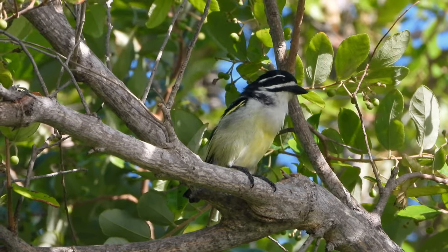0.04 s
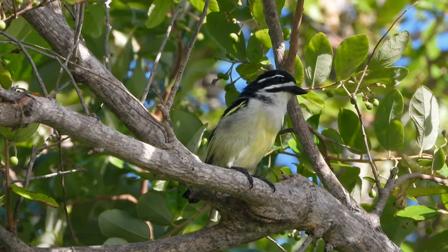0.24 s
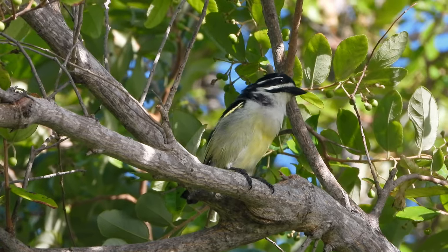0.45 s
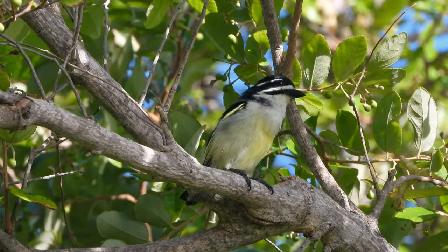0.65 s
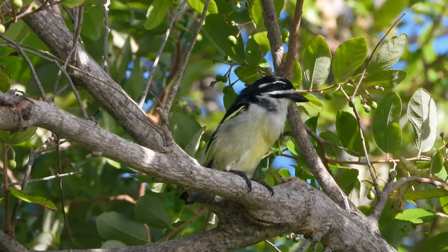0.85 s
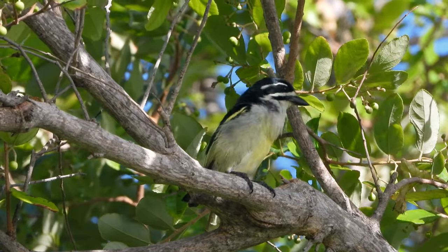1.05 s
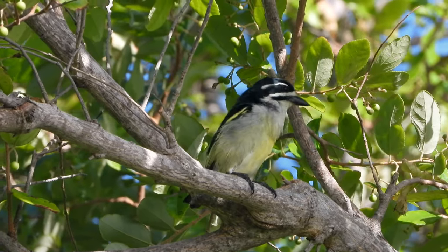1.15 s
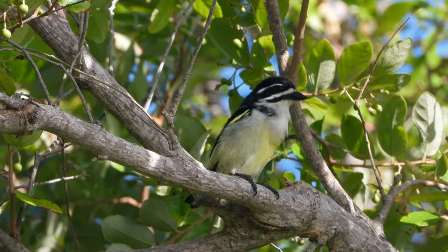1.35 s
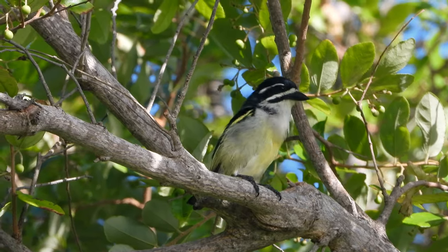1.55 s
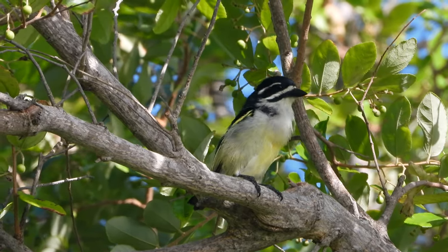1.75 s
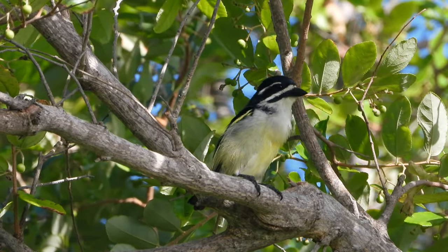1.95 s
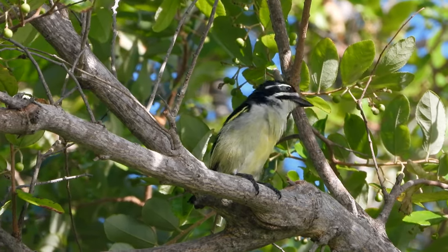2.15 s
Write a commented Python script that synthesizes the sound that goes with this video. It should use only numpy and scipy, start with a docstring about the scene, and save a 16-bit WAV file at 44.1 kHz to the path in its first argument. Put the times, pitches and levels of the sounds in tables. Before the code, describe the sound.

A small bird hoots five times in steady rhythm, with thin chirps from another bird.

```python
"""In a wood, leaves and distant air make a soft hiss, and faint whistles come from far off.
A tinkerbird on a branch gives five short, nearly pure hoots in a steady rhythm; reflection from the
trees sends each one back. Another small bird adds thin, high chirps, and near the end a few ticks
ring the damped modes of wood. All this is in the right channel; the left carries only its own hiss."""
import sys
import numpy as np
from scipy import signal
from scipy.fft import rfft, irfft
from scipy.io import wavfile

SR = 44100
rng = np.random.default_rng(int(sys.argv[2]) if len(sys.argv) > 2 else 0)


def unload_audio(sound):
    """Save the sound as a 16-bit wav file, at the path given as the first command line argument."""
    columns = np.transpose(np.atleast_2d(sound))
    # keep every value between -1 and 1, then stretch to whole-number steps
    steps = np.round(np.clip(columns, -1, 1) * 32767)
    wavfile.write(sys.argv[1], SR, steps.astype(np.int16))


N = 97020
TIME = np.arange(N) / SR
FREQS = np.maximum(np.arange(N // 2 + 1) * SR / N, 1)


def from_db(db):
    """Logarithmic level: 20 dB is a factor of ten in amplitude."""
    return 10 ** (np.asarray(db) / 20)


def noise(gains):
    """Spectral shaping: white noise weighted by a gain at each frequency, scaled to rms 1."""
    x = irfft(rfft(rng.standard_normal(N)) * gains, N)
    return x / np.std(x)


def colour(points):
    """Spectral envelope: gains interpolated between (frequency [Hz], level [dB]) points."""
    hz, db = np.transpose(points)
    return from_db(np.interp(np.log(FREQS), np.log(hz), db))


def drift(rate_hz):
    """Random modulation: low-passed noise of rms 1."""
    return noise(1 / (1 + (FREQS / rate_hz) ** 2))


def band_noise(edges_hz, order=3):
    """Band-pass filtering: noise of rms 1 between two frequencies."""
    band = signal.butter(order, edges_hz, "band", fs=SR, output="sos")
    x = signal.sosfilt(band, rng.standard_normal(N))
    return x / np.std(x)


def swell(middle, length):
    """Gaussian envelope: 1 at the middle, 1/e half a length to either side."""
    return np.exp(-(2 * (TIME - middle) / length) ** 2)


def among_trees(direct, echoes, scatter_db, t60_s):
    """Reflection and scattering: trees add distinct echoes, leaves an exponentially dying tail."""
    age = TIME[:SR // 2]
    build_up = np.minimum(age / .015, 1)
    tail = rng.standard_normal(len(age)) * from_db(-60 * age / t60_s) * build_up
    scattered = from_db(scatter_db) * signal.fftconvolve(direct, tail / np.linalg.norm(tail))[:N]
    reflected = sum(from_db(db) * np.interp(TIME - delay, TIME, direct, left=0) for delay, db in echoes)
    return direct + scattered + reflected


# Spectrum of the left channel's hiss: (frequency [Hz], relative density [dB])
HISS_SPECTRUM = [(30, -31), (60, -16), (110, -19), (200, -4.5), (400, -3), (1200, -1), (4000, -1),
                 (7000, -3), (11000, -6), (15500, -10.5)]

def hiss(level_db=-51.5, waver_db=0.33):
    """Noise floor: a broadband hiss whose level wavers slightly."""
    return from_db(level_db + waver_db * drift(6.7)) * noise(colour(HISS_SPECTRUM))


# Spectrum of leaves and distant air: (frequency [Hz], relative density [dB])
AIR_SPECTRUM = [(30, -43), (60, -34), (110, -10), (200, -2), (320, 1), (550, 1), (900, 2), (1600, -2.5),
                (3200, -4.5), (7000, -7), (11000, -11), (15500, -16)]
# The background hiss rises and falls, notably around the first two hoots: (time [s], level [dB])
BACKGROUND_LEVELS = [(0, -49.5), (.1, -48.5), (.17, -45), (.23, -44.5), (.33, -47), (.43, -46.5),
                     (.52, -44), (.6, -46.5), (.72, -46), (.88, -48), (1.35, -47.5), (1.44, -46.5),
                     (1.7, -49), (1.95, -46), (2.08, -45), (2.2, -42)]

def background(treble_hz=3600, treble_share=0.46):
    """Amplitude modulation: the background hiss rises and falls, less so in the treble."""
    times, db = np.transpose(BACKGROUND_LEVELS)
    level = np.interp(TIME, times, db)
    rise_db = level - level.mean()
    broadband = noise(colour(AIR_SPECTRUM))
    low = irfft(rfft(broadband) / (1 + (FREQS / treble_hz) ** 2), N)
    treble = broadband - low
    return from_db(level.mean()) * (low * from_db(rise_db) + treble * from_db(treble_share * rise_db))


# Swells of mid-pitched hiss: (middle time [s], length [s], level [dB])
HISS_SWELLS = [(0.174, 0.084, -53.5), (0.527, 0.028, -53.5), (0.72, 0.16, -56.5), (2.07, 0.064, -57.5)]

def hiss_swells(flutter_db=5.5):
    """Random amplitude modulation: brief, fluttering swells of mid-pitched hiss."""
    mid_hiss = band_noise(edges_hz=(1400, 2290), order=2)
    envelope = sum(from_db(db) * swell(middle, length) for middle, length, db in HISS_SWELLS)
    return envelope * from_db(flutter_db * drift(80)) * mid_hiss


# Distant calls: (middle time [s], length [s], frequency [Hz], bandwidth [Hz], level [dB])
FAR_WHISTLES = [(0.536, 0.4, 1644, 49.7, -56), (1.27, 0.17, 4270, 420, -55.5)]

def far_whistles():
    """Narrow-band noise has a pitch: faint whistles, blurred by distance into swells."""
    out = 0
    for middle, length, hz, width, db in FAR_WHISTLES:
        peak = 1 / (1 + (2 * (FREQS - hz) / width) ** 2)
        out += from_db(db) * swell(middle, length) * noise(peak)
    return out


# Taps on wood: (time [s], drive level [dB], spectral tilt [dB/octave])
TAPS = [(2.0641, -35, 25), (2.09, -50, -3), (2.1660, -17, 2)]
# Modes of the wood: (frequency [Hz], gain [dB], time to decay by 60 dB [s])
WOOD_MODES = [(2147, 9, 0.011), (2326, -8, 0.038), (3300, 1.5, 0.006), (4480, -4, 0.0072),
              (5600, -6, 0.0065)]
# Reflection of each tap: (delay [s], gain [dB])
TAP_REFLECTIONS = [(0.0114, -11)]

def ticks(contact_s=0.0019, tilt_limit_hz=3220):
    """Modal ringing: each tap excites the same damped modes; a sharper tap favours the upper ones."""
    lowest_hz = WOOD_MODES[0][0]
    out = 0
    for start, db, tilt in TAPS:
        age = np.maximum(TIME - start, 0)
        contact = 1 - np.exp(-(age / contact_s) ** 2)
        for hz, mode_db, t60 in WOOD_MODES:
            lift_db = tilt * np.log2(min(hz, tilt_limit_hz) / lowest_hz)
            decay = from_db(db + mode_db + lift_db - 60 * age / t60)
            out += contact * decay * np.sin(2 * np.pi * hz * age)
    return among_trees(out, TAP_REFLECTIONS, scatter_db=-9, t60_s=0.25)


def note(start, hold, hz, db, attack_s, sag_db_per_s, scoop_hz, scoop_s, fade_s, waver_hz, shimmer_db):
    """Amplitude and frequency modulation: envelope and phase of a note that scoops up, holds, closes."""
    age = np.maximum(TIME - start, 0)
    pitch = hz - scoop_hz * np.exp(-age / scoop_s) + waver_hz * drift(61)
    level = db - sag_db_per_s * np.minimum(age, hold) + shimmer_db * drift(34)
    opening = 1 - np.exp(-(age / attack_s) ** 2)
    closing = np.exp(-(np.maximum(age - hold, 0) / fade_s) ** 2)
    phase = 2 * np.pi * np.cumsum(pitch * (age > 0)) / SR
    return from_db(level) * opening * closing, phase


def blip(end, phase, lag_s, width_s, gain_db, drop_hz, fall_hz_per_s):
    """Linear frequency sweep: a brief tone just after a note, sliding down in pitch."""
    t = TIME - end - lag_s
    phase_lag = 2 * np.pi * t * (drop_hz + fall_hz_per_s * t / 2)
    return from_db(gain_db) * np.exp(-(t / width_s) ** 2) * np.cos(phase - phase_lag)


CHIRP_SHAPE = dict(scoop_hz=40, scoop_s=0.0048, fade_s=0.0049, waver_hz=15, shimmer_db=0.2)
CHIRP_BLIP = dict(lag_s=0.0065, width_s=0.0024, gain_db=0.5, drop_hz=163, fall_hz_per_s=69000)
# The small bird's notes: (time [s], hold [s], frequency [Hz], level [dB], attack [s], sag [dB/s])
CHIRP_NOTES = [(0.471, .018, 6955, -29, 0.0099, 0), (1.125, .027, 6965, -30.5, 0.0046, 40),
               (1.817, 0.0206, 6880, -30.5, 0.0063, 60)]
# Their reflections from the trees: (delay [s], gain [dB])
CHIRP_REFLECTIONS = [(0.0105, -15), (.0290, -17)]

def small_bird():
    """Frequency-modulated pure tones: thin chirps, each ending in a quick downward blip."""
    out = 0
    for start, hold, hz, db, attack, sag in CHIRP_NOTES:
        envelope, phase = note(start, hold, hz, db, attack, sag, **CHIRP_SHAPE)
        out += envelope * np.sin(phase) + from_db(db) * blip(start + hold, phase, **CHIRP_BLIP)
    return among_trees(out, CHIRP_REFLECTIONS, scatter_db=-4.5, t60_s=0.12)


HOOT_SHAPE = dict(scoop_hz=120, scoop_s=0.0023, fade_s=0.013, waver_hz=5.1, shimmer_db=0.67)
# A brief blip just after each hoot, as its echo begins
ECHO_BLIP = dict(lag_s=0.018, width_s=0.0034, gain_db=-10, drop_hz=35, fall_hz_per_s=6000)
BURST_DB, BURST_LAG_S, BURST_S = -31, 0.019, 0.031   # soft noise near the hoot's pitch, just after it
# The tinkerbird's notes:
# (time [s], hold [s], frequency [Hz], level [dB], attack [s], sag [dB/s], wash level [dB])
HOOT_NOTES = [(0.0952, 0.04, 1097, -15, 0.0052, -42, -46.5), (.5280, .042, 1090, -14.5, 0.0065, 12, -44.5),
              (.9620, 0.044, 1084, -15, 0.005, 66, -57), (1.3989, 0.04, 1091, -13.5, 0.0067, 44, -61),
              (1.847, 0.038, 1088, -14, .0068, 59, -61)]
# Their reflection from the trees: (delay [s], gain [dB])
HOOT_REFLECTIONS = [(.05485, -12.7)]

def tinkerbird(octave_db=-43.5, noise_db=-39, wash_t60_s=0.67):
    """Nearly sinusoidal oscillation: hoots, each followed by soft noise, an echo and a dull wash."""
    near_noise = band_noise(edges_hz=(798, 1243))
    wash = band_noise(edges_hz=(693, 950))
    hoots, blips, wash_envelope = 0, 0, 0
    for start, hold, hz, db, attack, sag, wash_db in HOOT_NOTES:
        envelope, phase = note(start, hold, hz, db, attack, sag, **HOOT_SHAPE)
        tone = envelope * (np.sin(phase) + from_db(octave_db) * np.sin(2 * phase))
        after = TIME - start - hold
        burst = from_db(db + BURST_DB) * np.exp(-((after - BURST_LAG_S) / BURST_S) ** 2)
        hoots += tone + near_noise * (from_db(noise_db) * envelope + burst)
        blips += from_db(db) * blip(start + hold, phase, **ECHO_BLIP)
        wash_onset = np.clip(after / BURST_S, 0, 1)
        wash_envelope += wash_onset * from_db(wash_db - 60 * np.abs(after) / wash_t60_s)
    echoing = among_trees(hoots, HOOT_REFLECTIONS, scatter_db=-28, t60_s=0.27)
    return echoing + blips + wash_envelope * wash


def scene():
    """Superposition: the sounds of the wood add up on the right; the left is plain hiss."""
    right = background() + hiss_swells() + far_whistles() + ticks() + small_bird() + tinkerbird()
    return np.array([hiss(), right])


def record(dry, cutoff_hz=15800):
    """Band limiting: an elliptic low-pass filter cuts the top steeply."""
    return signal.sosfilt(signal.ellip(12, .1, 80, cutoff_hz, fs=SR, output="sos"), dry)


dry = scene()
out = record(dry)
unload_audio(out)
```